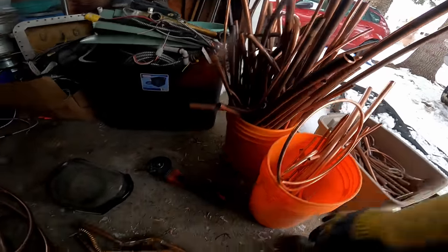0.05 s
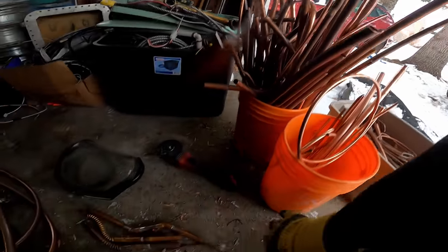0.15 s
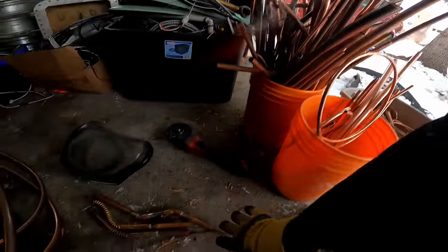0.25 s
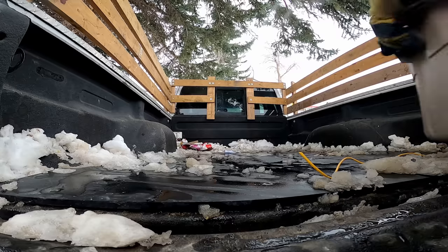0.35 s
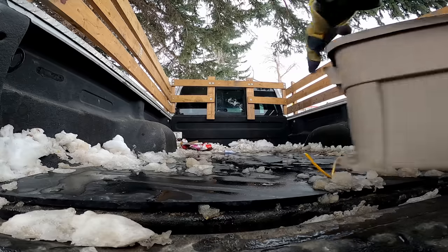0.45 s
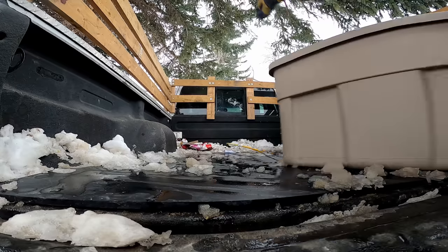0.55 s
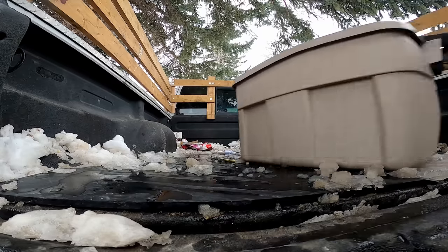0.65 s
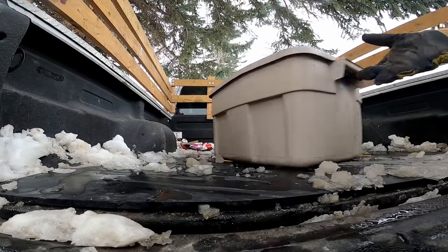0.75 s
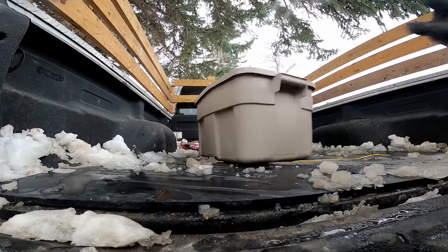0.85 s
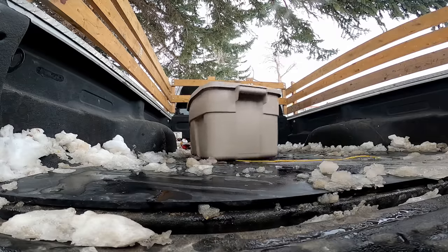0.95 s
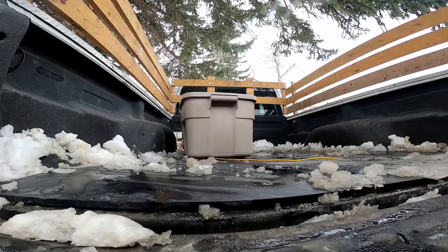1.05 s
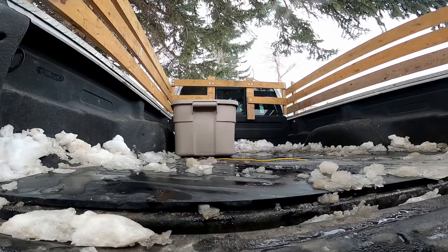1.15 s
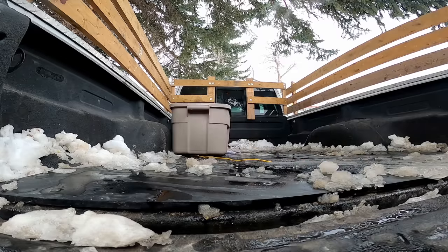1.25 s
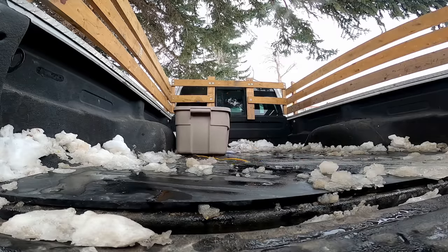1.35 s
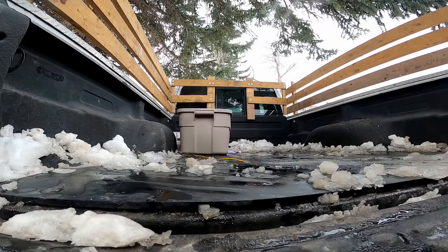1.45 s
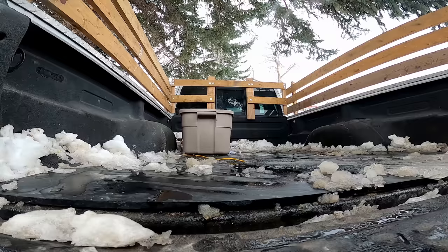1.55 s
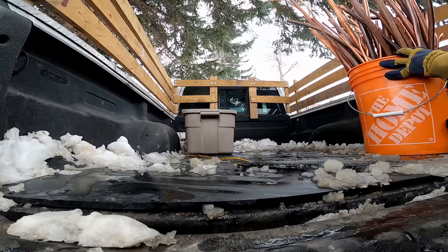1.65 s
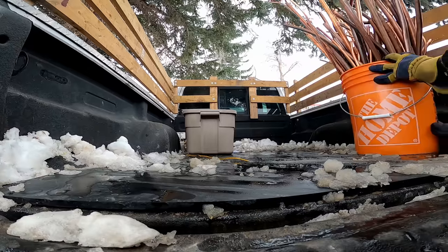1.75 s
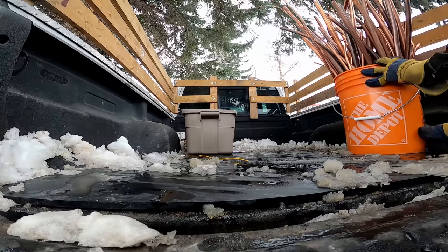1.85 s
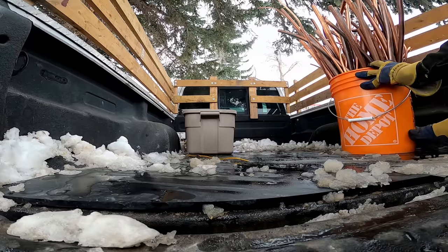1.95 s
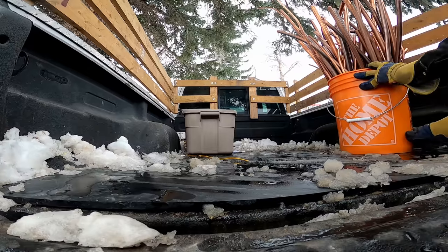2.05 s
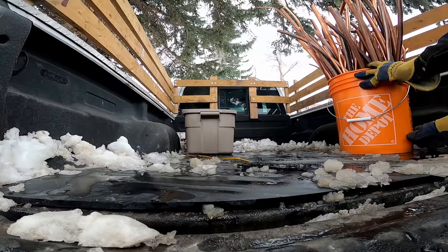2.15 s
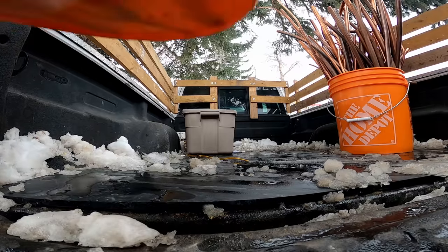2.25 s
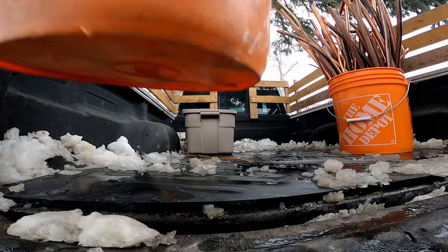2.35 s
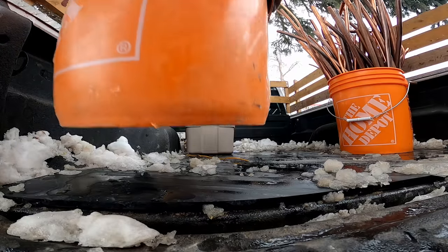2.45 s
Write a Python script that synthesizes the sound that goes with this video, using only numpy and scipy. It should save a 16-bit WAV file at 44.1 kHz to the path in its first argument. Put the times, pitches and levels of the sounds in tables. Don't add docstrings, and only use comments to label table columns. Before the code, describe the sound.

A loaded plastic tote scrapes and crunches over icy slush in a truck bed, then metal tubes jingle

```python
import sys
import numpy as np
from scipy import signal
from scipy.fft import rfft, irfft
from scipy.io import wavfile
from scipy.ndimage import uniform_filter1d

SR = 44100
rng = np.random.default_rng(int(sys.argv[2]) if len(sys.argv) > 2 else 0)


def invert_db(x):
    u = np.asarray(x, float) / 20
    return 10 ** u


def unload_wav(signal):
    wavfile.write(
        sys.argv[1],
        SR,
        np.round(np.clip(np.atleast_2d(signal).T, -1, 1) * 32767).astype(np.int16),
    )


N = 110250
LATE_PART_S = 1.8

# time_s, grit_level_db, hollow_body_weight_db, brightness_db
SHOVE = [(.3, -61, -3, 10), (.32, -59.5, 13.5, -9), (.44, -54.5, 6, -7), (.48, -57, 10, -5),
         (.52, -44, -20, 6), (.545, -27.5, 3, 0), (.7, -25.5, -14, 0.5), (.83, -28, 2, -2),
         (.94, -27, -2.5, 3.5), (1.03, -27.5, -3, -0.5), (1.08, -29, -4, -3.5), (1.25, -28.5, -0.5, -4),
         (1.38, -32.5, 6, -1), (1.5, -40.5, 7.5, 0), (1.61, -44.5, 6.5, -2), (1.83, -43.5, 1, -1),
         (2.02, -46, 0.5, -6.5), (2.14, -63, 9.5, -4)]
# frequency_hz, density_db_per_hz
GRIT_SPECTRUM = [(530, -21), (900, -7), (1320, -5.5), (2830, -6.5), (4680, -10.5), (8150, -10),
                 (10000, -15), (12700, -15.5), (16000, -25)]
# pitch_hz, width_hz, level_db
TOTE_MODES = [(199, 64, 2), (301, 53, 1), (382.5, 74, -1), (618, 218, -2), (811, 157, -3),
              (1006, 320, -6.5), (1500, 320, -13.5)]
# start_s, peak_db, t60_s, ring_hz, rise_s
KNOCK_EVENTS = [(.009, -49, 0.19, 2700, 0.0026), (.009, -50.5, 0.12, 5000, 0.0027),
                (.151, -49, 0.02, 3870, 0.00056), (.306, -45, 0.035, 810, 0.0018),
                (.345, -50, 0.073, 3480, .003), (.364, -48, 0.12, 6040, 0.002),
                (.419, -42, 0.034, 1390, 0.0009), (.486, -34.5, 0.033, 6640, 0.0088),
                (.501, -29.5, 0.12, 730, 0.0019), (.523, -26, 0.12, 2340, 0.004),
                (.597, -26.5, 0.12, 6300, 0.0016), (.713, -27.5, .07, 2700, 0.0017),
                (.750, -20, 0.054, 2340, 0.0023), (.773, -21.5, 0.026, 1330, 0.0044),
                (.805, -22, 0.022, 1960, 0.0008), (.822, -23.5, 0.048, 805, 0.00045),
                (.918, -28, 0.095, 7950, 0.0068), (1.02, -28, 0.2, 1110, 0.0016),
                (1.164, -25, 0.094, 2830, 0.0043), (1.195, -35, 0.06, 5450, 0.0033),
                (1.265, -24, 0.082, 1500, 0.0046), (1.327, -33.5, 0.086, 5140, 0.0011),
                (1.574, -34.5, 0.054, 735, 0.0021), (1.626, -25.5, 0.19, 2940, 0.0014),
                (1.683, -35, 0.087, 7660, 0.0029)]
# start_s, peak_db, t60_s,
# ring_hz, rise_s
MORE_KNOCKS = [(1.708, -40, 0.064, 3730, 0.0056), (1.755, -32, 0.055, 860, 0.0023),
               (1.797, -39, 0.3, 4000, 0.0023), (1.931, -44.5, 0.24, 4800, 0.0087),
               (1.99, -41, 0.069, 2680, 0.0087), (2.178, -48, 0.12, 5570, 0.007),
               (2.19, -46.5, 0.12, 870, 0.0056), (2.165, -55.5, 0.26, 5000, 0.0093),
               (2.255, -49, 0.14, 1800, 0.0046), (2.265, -38, 0.12, 1440, 0.0036),
               (2.335, -41.5, 0.071, 1420, 0.0035), (2.432, -47, 0.047, 750, 0.00079),
               (2.485, -32, 0.051, 1390, 0.0054), (.678, -25, 0.079, 3030, 0.0074)]
# frequency_hz, density_db_per_hz
KNOCK_SPECTRUM = [(180, -15), (300, -6.5), (814, -6.5), (2000, -15), (3190, -23.5), (4370, -21),
                  (5430, -16.5), (16000, -29)]
TUBE_PITCHES = [810, 1380, 2100, 2740, 3300, 4400, 5000, 5500, 6250, 6800, 7900]
# start_s, peak_db, t60_s
TOTE_THUMPS = [(0.309, -38.5, 0.38), (0.382, -53, 0.068), (0.333, -43.5, 0.094), (0.418, -45, 0.14),
               (0.451, -34.5, 0.11), (0.537, -24, 0.2), (0.562, -17.5, 0.11), (0.599, -24, 0.5),
               (0.772, -28, 0.43), (1.266, -21.5, 0.23), (1.325, -26, 0.33), (1.574, -28, 0.029),
               (1.627, -35.5, 0.11)]
# start_s, peak_db, pitch_hz, t60_s
TUBE_PINGS = [(0.01, -45.3, 4780, 0.071), (0.011, -46, 2740, 0.033), (0.013, -55, 8000, 0.061),
              (0.015, -42.5, 2040, 0.05), (0.523, -27, 1580, 0.03), (0.526, -36, 2646, 0.044),
              (0.526, -26, 2196, 0.024), (0.528, -24, 805.3, 0.081), (0.539, -29.7, 3785, 0.11),
              (0.544, -36, 8967, 0.04), (0.596, -28, 6520, 0.044), (0.713, -22, 2740, 0.04),
              (0.921, -31.6, 8500, 0.1), (0.922, -26, 8070, 0.04), (0.927, -30.9, 7450, 0.04),
              (1.164, -28.4, 1750, 0.036), (1.193, -33.5, 5475, 0.04), (1.251, -33, 8700, 0.035),
              (1.267, -21.6, 747, 0.029), (1.267, -25.5, 266, 0.031), (1.269, -31, 2370, 0.04),
              (1.304, -19.5, 805, 0.027), (1.326, -30.5, 4961, 0.044), (1.327, -33, 7720, 0.056),
              (1.329, -19, 441, 0.064), (1.386, -25, 214, 0.077), (1.407, -24.5, 213, 0.076),
              (1.472, -35.5, 950, 0.12), (1.624, -35, 7400, 0.04), (1.626, -47, 2820, 0.04),
              (1.628, -31, 6174, 0.063), (1.629, -33, 8000, 0.04), (1.635, -29, 5430, 0.044),
              (1.639, -37, 3230, 0.096), (2.18, -61, 8820, 0.04), (2.182, -56, 8040, 0.073),
              (2.186, -51.9, 7423, 0.067), (2.264, -50, 4410, 0.04), (2.268, -46, 6660, 0.043),
              (2.268, -52, 6247, 0.045), (2.269, -49, 8489, 0.036), (2.339, -55, 6300, 0.05),
              (2.339, -53, 2610, 0.045), (2.34, -61, 4600, 0.045)]
# start_s, peak_db, pitch_hz, t60_s
MORE_PINGS = [
    (0.01, -46, 3300, .04),
    (1.631, -28, 810, 0.055),
    (1.644, -32.5, 1256, .06),
    (2.183, -48.5, 2760, 0.071),
]
# start_s, peak_db
ICE_SNAPS = [(0.5027, -23), (0.5231, -16), (0.5444, -7.5), (0.6436, -11), (0.6846, 0), (0.715, -8),
             (0.7404, -8), (0.7541, -17), (0.8063, -17), (0.8237, -23), (0.8626, -10), (0.922, -10),
             (1.002, -18), (1.0678, -26)]
# time_s, level_db
WIND_GUSTS = [(0, -45.5), (.15, -43), (.21, -30.5), (.3, -40.5), (.335, -30), (.49, -42), (.57, -27.5),
              (.72, -34.5), (.95, -34), (1.08, -40.5), (1.61, -35), (1.64, -35), (1.72, -19.5),
              (1.79, -36.5), (2.04, -27.5), (2.18, -37.5), (2.3, -39.5), (2.5, -38.5)]
# frequency_hz, density_db_per_hz
WIND_SPECTRUM = [(8.8, -12), (15, 8.5), (52, -3), (100, -18), (146, -31), (200, -55), (260, -76),
                 (440, -120)]
# frequency_hz, density_db_per_hz
YARD_SPECTRUM = [(88, -28), (150, 1), (361, -1.5), (504, -5.5), (837, -3), (2220, -15.5), (6640, -20),
                 (14500, -31), (16000, -32)]
# frequency_hz, level_db
PORT_DIFFERENCE = [(30, -42), (180, -31), (700, -33), (3000, -30), (6000, -25), (10000, -20), (14000, -22)]


def slide():
    t = np.arange(N) / SR
    start_s, stop_s = SHOVE[0][0], SHOVE[-1][0]
    moving = np.clip((t - start_s) / 0.012, 0, 1) * np.clip((stop_s - t) / 0.043 + 1, 0, 1)

    smooth_share = 0.75
    cracking = grains(11000, 2.5, 1.86, 710, 13800)
    crunch = (1 - smooth_share) * cracking + smooth_share * rng.standard_normal(N)
    rattle = invert_db(-5) * grains(2500, 1.7, 26, 1002.0, 7463)
    grit = evened(colour(evened(crunch) + rattle, GRIT_SPECTRUM))
    top = signal.sosfiltfilt(signal.butter(2, 6500, "high", fs=SR, output="sos"), grit)
    grit = grit + (invert_db(curve(SHOVE, order=3)) - 1) * top

    drum = body(clicks(750, 4.0) + rng.standard_normal(N))
    thin = evened(signal.sosfilt(signal.butter(4, 333, "high", fs=SR, output="sos"), drum))
    drum = np.where(t < LATE_PART_S, .35 * drum + .65 * thin, thin)
    drum_weight = invert_db(curve(SHOVE, order=2) + 2.0)
    return moving * invert_db(curve(SHOVE, order=1)) * (grit * judder() + drum * judder() * drum_weight)


def judder():
    depth_db, window = 1.5, int(0.025 * SR)
    wander = uniform_filter1d(uniform_filter1d(rng.standard_normal(N), window), window)
    return invert_db(depth_db * evened(wander))


def body(drive):
    ring = np.zeros(N)
    for k, (hz, width, db) in enumerate(TOTE_MODES):
        ring += (-1) ** k * invert_db(db) * resonate(drive, hz, width) / np.sqrt(width)
    return evened(ring)


def thumps():
    t = np.arange(N) / SR
    blows = sum(strike(t - s, db, t60, 0.0043) for s, db, t60 in TOTE_THUMPS)
    return body(rng.standard_normal(N)) * blows


def knocks():
    crack = clicks(6000, 2.0) + 0.44 * rng.standard_normal(N)
    burst = evened(colour(crack, KNOCK_SPECTRUM))
    white, out = rng.standard_normal(N), np.zeros(N)
    for s, db, t60, hz, rise in KNOCK_EVENTS + MORE_KNOCKS:
        a, b = int(s * SR), int((s + .2) * SR)
        t = np.arange(N)[a:b] / SR - s
        wide = signal.lfilter(*signal.butter(3, min(6.0 * hz, .45 * SR), fs=SR), burst[a:b])
        ring = invert_db(-10) * band(white[a:b], hz, .07 * hz)
        focus = invert_db(-2) * band(crack[a:b], hz, hz)
        out[a:b] += strike(t, db - 2.5, t60, rise) * (wide + ring + focus)
        out[a:b] += strike(t, db - 12, 1.25 * t60, rise) * jingle(crack[a:b], hz)
    return out


def jingle(crack, hz):
    out = np.zeros(len(crack))
    for tube_hz, (unshaken, q) in zip(TUBE_PITCHES, rng.random((len(TUBE_PITCHES), 2))):
        level_db = -6.0 * abs(np.log2(tube_hz / hz)) - 12 * unshaken
        out += invert_db(level_db) * band(crack, tube_hz * (1 + .04 * (q - .5)), 80)
    return evened(out)


def pings():
    out, t = np.zeros(N + SR), np.arange(SR // 4) / SR
    rows = TUBE_PINGS + MORE_PINGS
    for (s, db, hz, t60), (phase, waver_phase) in zip(rows, rng.random((len(rows), 2))):
        waver = 1 + .02 * np.sin(2 * np.pi * (45 * t + waver_phase))
        turns = np.cumsum(hz * waver) / SR
        tone = np.sin(2 * np.pi * (turns + phase))
        out[int(s * SR):][:len(t)] += strike(t, db + 2.5, 1.3 * t60, .003) * tone
    return out[:N]


def snaps():
    out, t = np.zeros(N + SR), np.arange(SR // 4) / SR
    snap_hz, t60_s, ceiling_db = 3000, .0014, -11
    for k, (s, db) in enumerate(ICE_SNAPS):
        decay = invert_db(min(db, ceiling_db) + 1.5 - 60 * t / t60_s)
        out[int(s * SR):][:len(t)] += (-1) ** k * decay * np.cos(2 * np.pi * snap_hz * t)
    return out[:N]


def bed(x):
    t = np.arange(8000) / SR
    sparse = rng.standard_normal(8000) * (rng.random(8000) < .05)
    taps = sparse * invert_db(-60 * t / 0.099) * (t > .003)
    return signal.oaconvolve(x, taps / np.linalg.norm(taps))[:N]


def wind():
    level_db = curve(WIND_GUSTS, order=1)
    gusts = invert_db(level_db) * evened(colour(rng.standard_normal(N), WIND_SPECTRUM + [(800, -100)]))
    calmer_db = 20 * (np.arange(N) / SR > 1.6)
    flap_db = -31.5 + 1.82 * (level_db + 28.5) - calmer_db
    return gusts + band(clicks(90, 4.0), 74.7, 37) * invert_db(flap_db)


def wind_pop():
    start_s, peak_db, fall_s, back_s = 2.224, -9, 0.00306, 0.003
    t = np.arange(N) / SR - start_s
    pop = -invert_db(peak_db) * np.clip(t / fall_s, 0, 1) * np.exp(-np.maximum(t - fall_s, 0) / back_s)
    return signal.lfilter(*signal.butter(1, 24.6, "high", fs=SR), pop)


def yard():
    level_db, late_top_db = -52, -5.5
    hush = evened(colour(rng.standard_normal(N), YARD_SPECTRUM))
    top = signal.sosfiltfilt(signal.butter(2, 1200, "high", fs=SR, output="sos"), hush)
    late = np.arange(N) / SR > LATE_PART_S
    return invert_db(level_db) * (hush + (invert_db(late_top_db) - 1) * top * late)


def grains(per_s, spread_db, cycles, low_hz, high_hz):
    train, which, out = clicks(per_s, spread_db), rng.integers(0, 30, N), np.zeros(N)
    pitches = np.geomspace(low_hz, high_hz, num=30) * rng.uniform(0.91, 1.04, size=30)
    for k, hz in enumerate(pitches):
        turns = np.arange(1500) / SR * hz
        envelope = (1 - np.exp(-2 * turns)) * np.exp(-2 * turns / cycles)
        wavelet = hz * np.sin(2 * np.pi * turns) * envelope
        out += signal.oaconvolve(train * (which == k), wavelet)[:N]
    return evened(out)


def clicks(per_s, spread_db):
    u = rng.random((N, 3))
    size = invert_db(spread_db * np.minimum(-np.log(u[:, 1] + 1e-9), 5))
    return np.sign(u[:, 0] - .5) * size * (u[:, 2] < per_s / SR)


def strike(t, peak_db, t60, rise):
    t = np.maximum(t, 0)
    attack = np.sin(np.pi / 2 * np.minimum(t / rise, 1)) ** 2
    return attack * invert_db(peak_db - 60 * np.maximum(t - rise, 0) / t60)


def resonate(x, hz, width):
    turn = np.exp(2j * np.pi * hz * np.arange(len(x)) / SR)
    r = np.exp(-np.pi * width / SR)
    return 2 * (turn * signal.lfilter([1 - r], [1, -r], x / turn)).real


def band(x, hz, width):
    return evened(resonate(resonate(x, hz, width), hz, 2 * width))


def evened(x):
    return x / np.sqrt(np.mean(x ** 2) + 1e-20)


def read(points, hz):
    f, value = np.transpose(points)
    return np.interp(np.log(hz + 1), np.log(f + 1), value)


def colour(x, points):
    return irfft(rfft(x) * invert_db(read(points, np.fft.rfftfreq(len(x), 1 / SR))), len(x))


def curve(table, order):
    rows = np.array(table)
    return np.interp(np.arange(N) / SR, rows[:, 0], rows[:, order])


def scene():
    near = slide() + knocks() + thumps() + pings() + snaps()
    mid = near + invert_db(-16) * bed(near) + wind() + wind_pop() + yard()
    smear = rng.standard_normal(3000) * invert_db(-.02 * np.arange(3000))
    smeared = signal.oaconvolve(mid, smear / np.linalg.norm(smear))[:N]
    side = colour(smeared, PORT_DIFFERENCE)
    return np.array([mid + side, mid - side])


def low_pass(x):
    return signal.sosfilt(signal.butter(12, 16670, fs=SR, output="sos"), x)


def record(dry):
    ceiling, edge_hz = .33, 15830
    held = dry / (1 + (dry / ceiling) ** 6) ** (1 / 6)
    finished = irfft(rfft(held) * (np.fft.rfftfreq(N, 1 / SR) < edge_hz), N)
    return low_pass(finished)


dry = scene()
out = record(dry)
unload_wav(out)
```